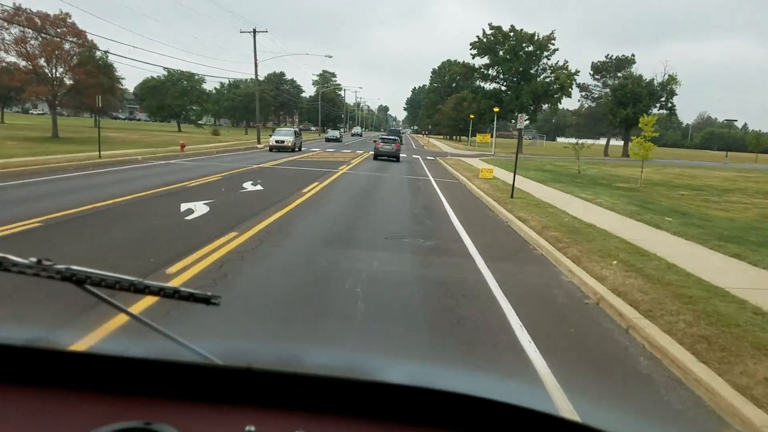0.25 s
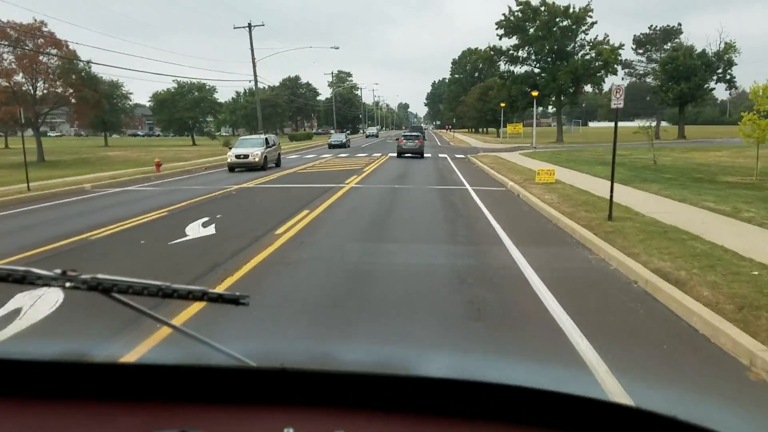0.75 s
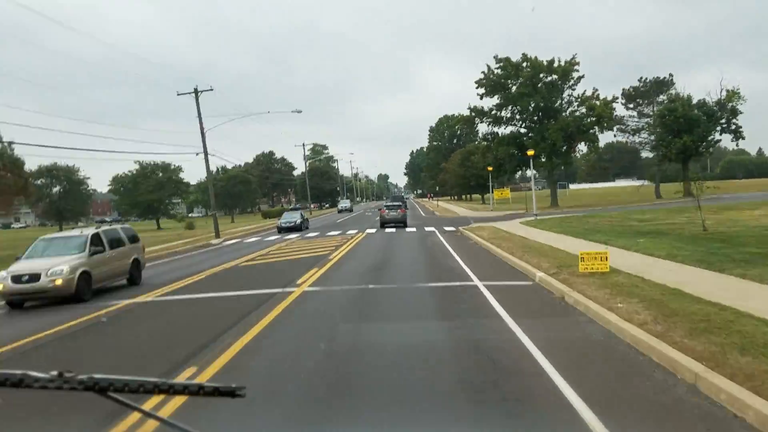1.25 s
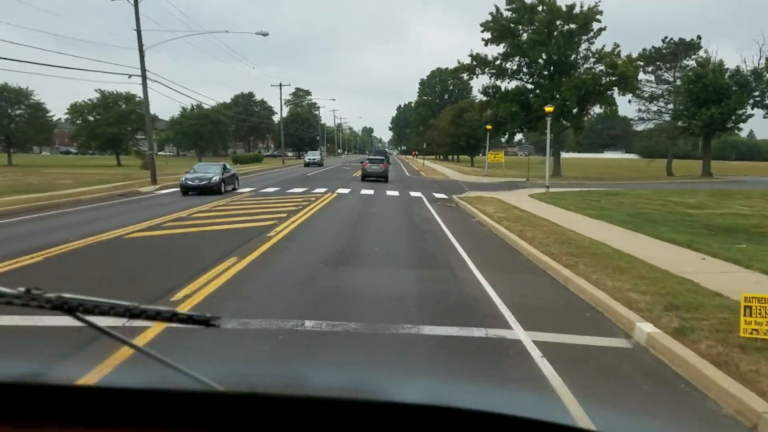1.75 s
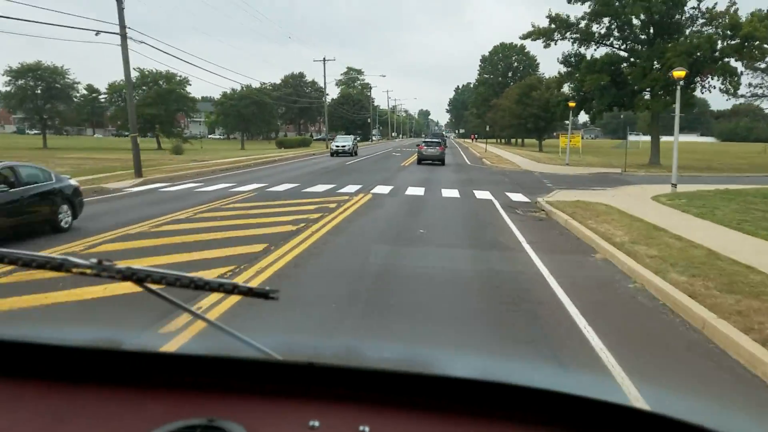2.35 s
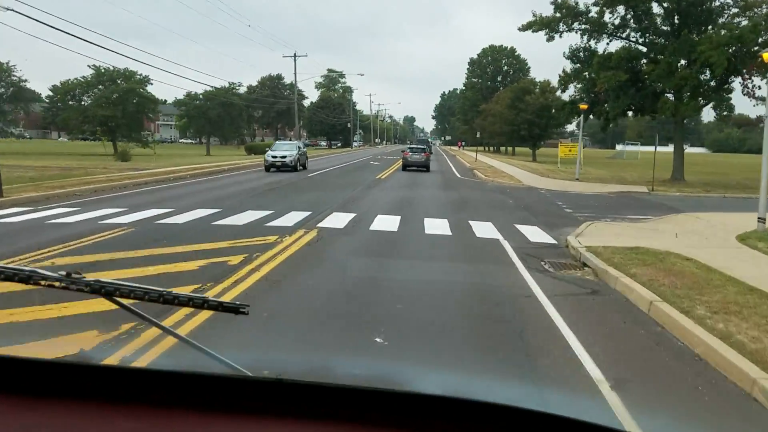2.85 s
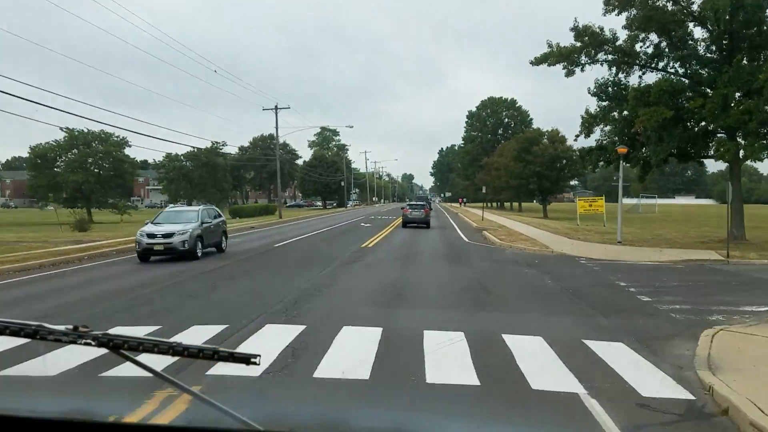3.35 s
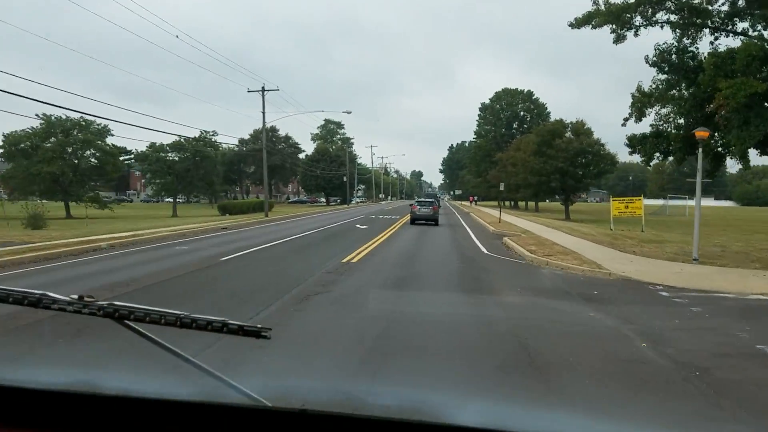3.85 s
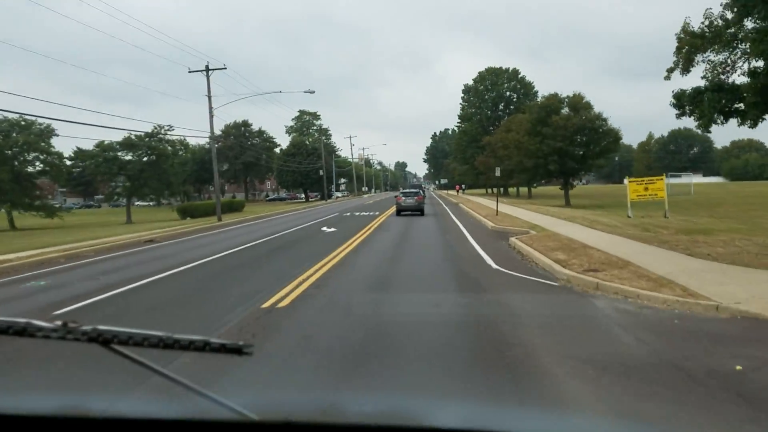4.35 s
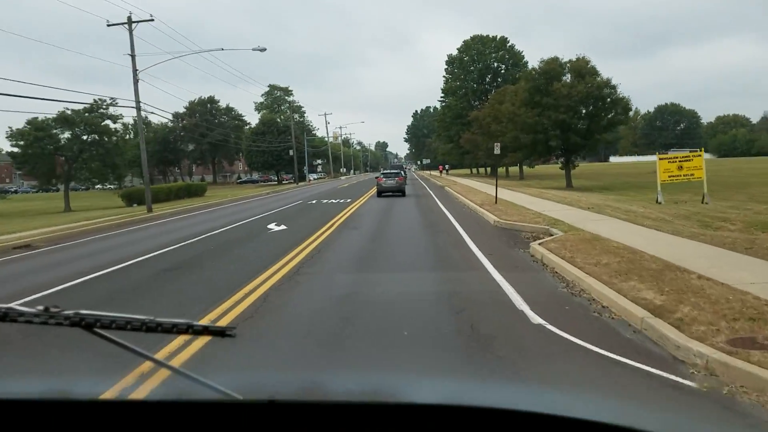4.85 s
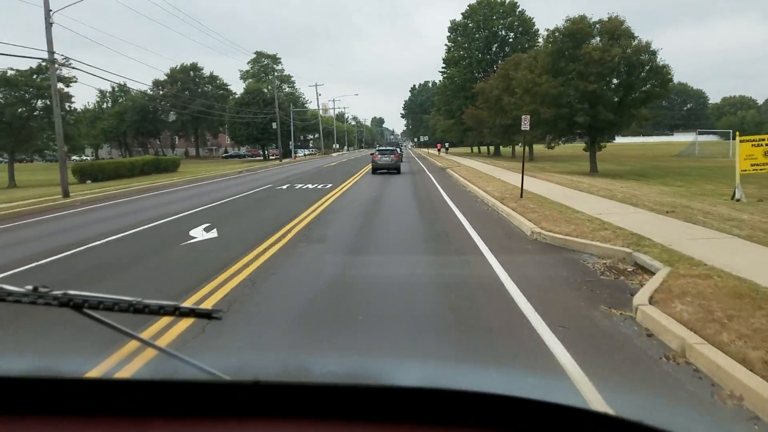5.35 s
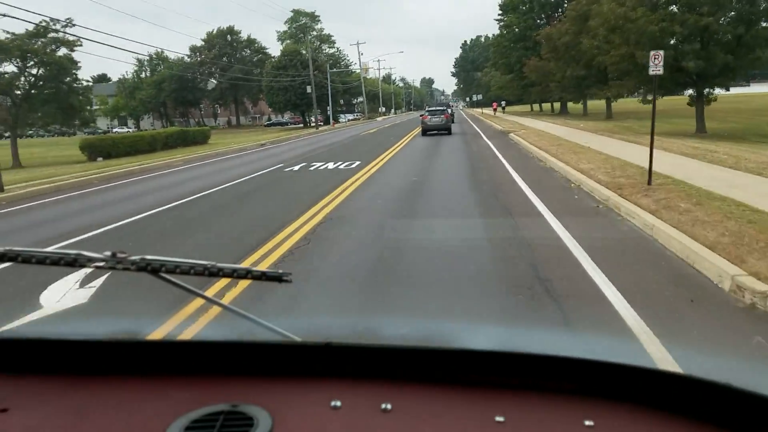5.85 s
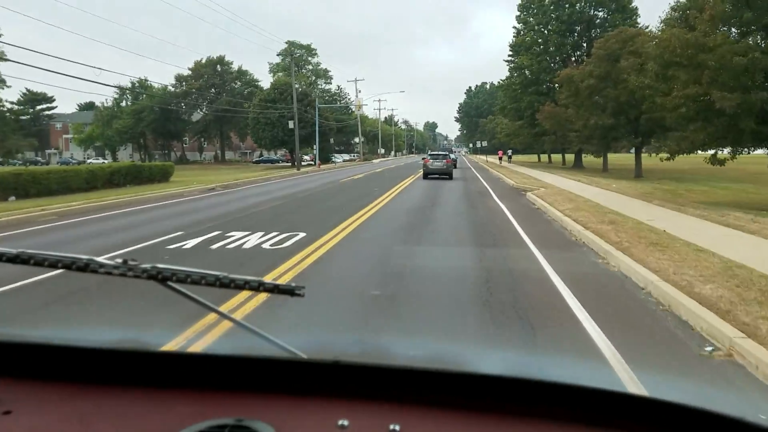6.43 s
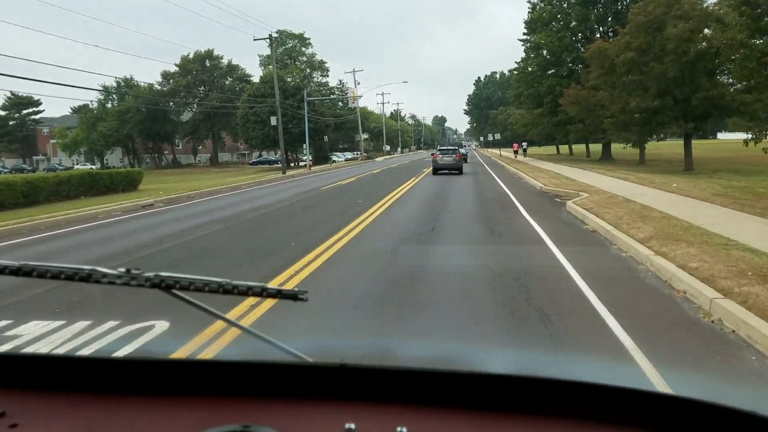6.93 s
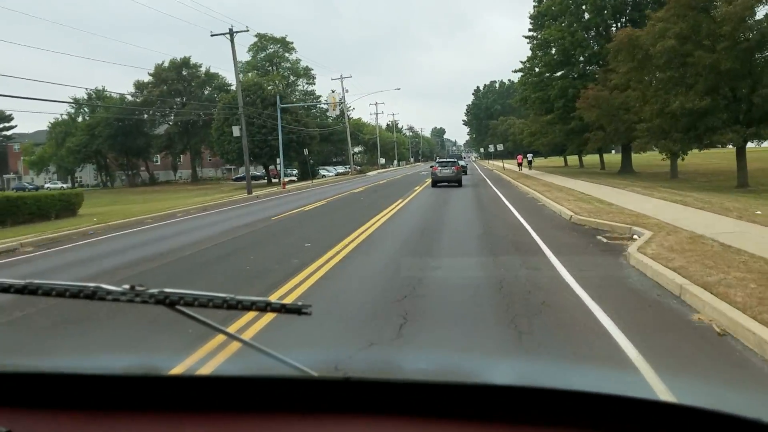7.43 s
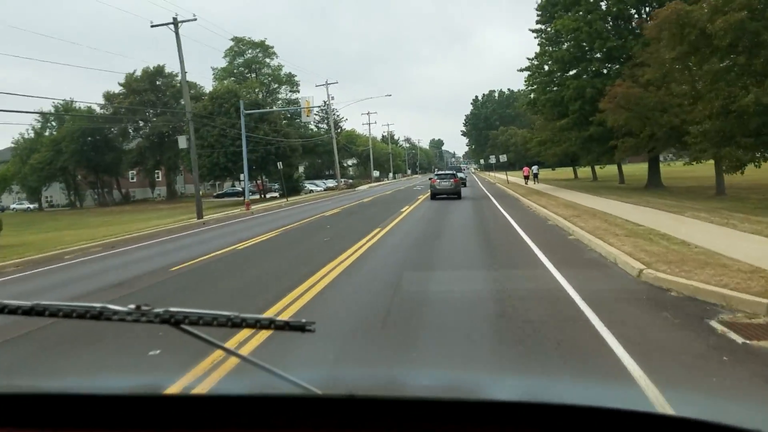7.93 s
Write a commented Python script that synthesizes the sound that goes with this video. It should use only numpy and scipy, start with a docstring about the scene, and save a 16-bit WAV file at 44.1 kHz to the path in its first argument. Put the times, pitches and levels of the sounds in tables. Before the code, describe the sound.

A large diesel truck engine drones and clatters throughout, heard from inside the hollow, booming cab with tyre rumble and a steady hiss of air. In the first second the engine runs lightly while a draught thumps on the right microphone. At about 1.3 seconds the engine takes on load and grows louder, and rough road brings heavier rumble, a flurry of rattling fittings and a few thin, high squeaks until about 2 seconds. The drone holds, with brief rattles around 3.5 to 4 seconds. From 5 to 5.7 seconds the rumble swells again with more wind buffeting, then the engine eases. It pushes again near 7 seconds, with another bump and a faint, buzzy metallic ring, also heard around 2 seconds. From 7.5 seconds it eases off and drops slightly in pitch, with more wind thumps around 8 seconds.

```python
"""A deep diesel drone fills the cab of a cruising truck, over rumbling tyres and hissing air.
Each cylinder of the two-stroke V8 fires once per crankshaft turn, so the exhaust drones, the engine
clatters and a metal part sings near 2 kHz. A draught buffets the right microphone, loose fittings
rattle, and trim squeaks on the first rough patch of road. The driver adds load and eases off again."""
import sys
import numpy as np
from scipy import signal
from scipy.fft import rfft, irfft, next_fast_len
from scipy.io import wavfile
from scipy.ndimage import map_coordinates

SR = 44100
rng = np.random.default_rng(int(sys.argv[2]) if len(sys.argv) > 2 else 0)


def unload_wav(signal):
    """Save mono or channel-first audio to the path in sys.argv[1] as 16-bit WAV at rate SR, clipped to [-1, 1]."""
    wavfile.write(
        sys.argv[1],
        SR,
        np.round(np.clip(np.atleast_2d(signal).T, -1, 1) * 32767).astype(np.int16),
    )


N = 361175

# How alike the two sides of the cab sound: pitch_hz, likeness (0 to 1)
STEREO_LIKENESS = [(30, 0.36), (110, 0.87), (200, 0.98), (380, 0.7), (700, 0.57), (1300, 0), (2400, 0),
                   (4400, 0)]
# Which side is louder: pitch_hz, left_minus_right_db
STEREO_BALANCE = [(30, -2), (100, -1.5), (500, -0.5), (1200, 2), (2500, 2.5), (4500, 0.5), (8500, 3.3),
                  (13000, 0)]
# How fast the crankshaft spins: time_s, turns_per_s
CRANK_SPEED = [(0, 25.88), (.65, 25.77), (1.05, 25.83), (1.4, 25.58), (1.65, 25.7), (1.92, 25.53),
               (2.15, 25.63), (2.5, 25.55), (3.5, 25.62), (4.8, 25.71), (6.1, 25.89), (6.6, 25.85),
               (7.1, 25.55), (7.4, 25.47), (7.7, 25.29), (8.19, 25.1)]
# The driver's pedal: time_s, effort_db, firing_note_db
PEDAL = [(0, -4.5, -24), (.6, -6, -27.5), (1.15, -5.5, -26), (1.38, 1.5, -23.5), (1.72, 2, -17),
         (1.95, 1, -18), (2.55, 2, -15), (3.05, 0, -16.5), (4.05, 0.5, -16), (5.57, -1.5, -18),
         (5.75, -3, -23.5), (6.4, -4.5, -21), (6.73, -4.5, -25), (6.98, 0.5, -19), (7.36, 1, -20),
         (7.55, -2, -28.5), (8.19, -2, -26.5)]
# The drone's notes, called orders: cycles_per_turn, relative_db, left_minus_right_db
DRONE_ORDERS = [(2, -24, -2), (3, -21, 1), (4, -1, 1), (5, -8, -2), (6, -9, 2), (7, -19, 0), (8, 0, 0),
                (9, -8, -1), (10, -23, 0), (11, -8, 5), (12, -17, -1), (13, -24, -1), (15, -19, 6),
                (16, -22, -6), (17, -19, 7), (20, -19, -3), (21, -23, -1), (22, -22, 1), (24, -21, 12),
                (28, -25, 4), (29, -20, -2), (30, -24, -1), (31, -25, 5), (33, -25, 8), (34, -25, -2),
                (35, -24, 1), (38, -23, 5), (40, -22, -2), (42, -21, 10)]
# The beat of one bank (row) of four cylinders: time_s, level_db
BANK_BEAT = [(0, -22.5), (.7, -25.5), (1.2, -20.5), (1.4, -15), (2, -17.5), (2.2, -19.5), (3.75, -18.5),
             (3.98, -13.5), (4.2, -17), (5.52, -17.5), (5.72, -20), (7.3, -22.5), (7.9, -19.5), (8.19, -22)]
# The throb of uneven cylinders: time_s, level_db
CYLINDER_THROB = [(0, -26), (1.45, -26.5), (1.65, -22), (2.2, -19.5), (3, -26), (5.1, -25), (5.9, -30.5),
                  (6.8, -27), (7.3, -20), (7.55, -26.5), (8.19, -26)]
# The whine of a timing gear: time_s, level_db
GEAR_WHINE = [(0, -38), (1, -37.5), (2, -34), (5, -35.5), (6.1, -39), (6.9, -31.5), (7.3, -42), (8.19, -40)]
# Ringing engine covers: pitch_hz, width_hz, gain_db
COVER_RINGS = [(516.6, 11.5, -2.5), (739, 13.6, 2), (828, 20, -4), (1048, 39, 1.5), (1250, 42, -16),
               (1591, 38, -7.5)]
# Spells when the metal part sings out: peak_s, level_db, half_length_s
SINGING_SPELLS = [(.96, -40.5, 0.14), (2.17, -38, 0.23), (3.442, -35, 0.034), (4.96, -42, 0.046),
                  (5.317, -36.5, 0.062), (6.3, -42, 0.34), (7.354, -36.5, 0.49)]
# Rough patches of road: start_s, extra_rumble_db, length_s
ROUGH_PATCHES = [(1.25, 12.5, 0.38), (2.7, 0, .12), (5.078, 6.5, 0.69), (7.127, 9, 0.3), (7.95, 2.5, 0.18)]
# The strongest eddies (swirls of air): peak_s, thud_db, rasp_db, half_length_s
STRONG_EDDIES = [(0.137, -10, -21, 0.026), (0.227, -9, -15, 0.024), (0.331, -4, -11, 0.0087),
                 (0.407, -8, -27, 0.018), (0.584, -1.5, -9, 0.0057), (0.656, -14, -20, 0.017),
                 (1.245, -11, -25, 0.015), (2.342, -7, -21, 0.019), (2.781, -9, -25, 0.022),
                 (3.354, -8, -32, 0.011), (4.539, -8, -22, 0.013), (4.889, -5.5, -17, 0.039),
                 (5.358, -8, -32, 0.012), (5.506, -7.5, -11.5, 0.017), (5.562, -8, -14, 0.01),
                 (6.149, -8, -16, 0.016), (7.233, -10, -14.5, 0.015), (7.387, -9, -26, 0.025),
                 (8.055, -7.5, -20, 0.037), (8.147, -7.5, -11.5, 0.028)]
# Gusts full of weaker eddies: start_s, end_s
GUST_TIMES = [(.08, .22), (1.27, 1.7), (5.08, 5.75), (7.05, 8.7)]
# Loose fittings rattling: start_s, jingle_db, clack_db
RATTLE_HITS = [(0.3294, -48, -39), (0.6913, -40, -43), (1.3424, -21.5, -34), (1.3644, -36, -24.5),
               (1.4094, -34, -35), (1.5354, -35, -28.5), (1.6394, -43, -29), (1.6821, -38, -30),
               (1.8557, -28, -32), (2.1355, -38, -35), (3.5753, -27, -40), (3.7479, -26, -34),
               (3.9973, -35, -38), (4.2228, -36, -45), (6.0921, -34, -41), (7.8785, -33, -39)]
# Squeaking trim: peak_s, pitch_hz, level_db, half_length_s
TRIM_SQUEAKS = [(1.402, 8900, -36, .03), (1.477, 8970, -27, 0.0096), (1.495, 8800, -40, .03),
                (1.574, 8380, -35, .02)]

# The tone colour of each noisy sound: pitch_hz, gain_db
BLOCK_SPECTRUM = [(250, -18), (600, -2), (1050, 1), (1400, -5), (1650, -4), (1900, -7), (2150, -9),
                  (2450, -13.5), (2900, -23), (4500, -35), (9000, -60)]  # clattering engine block
TYRE_SPECTRUM = [(15, -24), (30, 0), (50, 3), (80, 7.5), (115, 1.5), (160, 5.5), (250, 6.5), (400, -35),
                 (800, -74)]  # rumbling tyres and chassis
CAB_SPECTRUM = [(50, -20), (90, 10), (135, 6.5), (180, 0.5), (280, 6.5), (350, 0.5), (520, -2.5), (750, -2),
                (950, -34), (1600, -16), (4000, -74)]  # booming hollow cab
AIR_SPECTRUM = [(1200, -33), (2600, 0), (3800, 0.5), (4700, -2), (5700, -7), (7400, -10.5), (8700, -7),
                (10000, -13), (12000, -11.5), (15800, -13)]  # hissing air
RASP_SPECTRUM = [(150, -14), (350, 5.5), (550, -4), (900, -15), (1600, -38), (3500, -43), (7000, -72)]  # fine turbulence in an eddy
JINGLE_SPECTRUM = [(3000, -25), (7000, -10), (11000, 0.5), (15000, 1)]  # bright part of a rattle
CLACK_SPECTRUM = [(500, -17), (1300, 2), (2300, 3.5), (3000, -11.5), (4800, -10.5), (8000, -21.5)]  # lower part of a rattle

TOP_HZ = 15850


def amp(db):
    """Turn decibels into a number to multiply by."""
    return 10 ** (np.asarray(db) / 20)


def unit(x):
    """Scale a signal to an average (rms) level of 1."""
    return x / np.sqrt(np.mean(x ** 2) + 1e-20)


def along(points, hz):
    """Read between (pitch_hz, value) points on a logarithmic pitch scale."""
    pitches, values = np.transpose(points)
    return np.interp(np.log(hz + 1), np.log(pitches + 1), values)


def curves(rows):
    """Give each column after the time one value per sample."""
    times, *columns = np.transpose(rows)
    return [np.interp(np.arange(N) / SR, times, column) for column in columns]


def wobble(rate):
    """A smooth curve through `rate` random values a second."""
    knots = rng.standard_normal(int(N * rate / SR) + 4)
    coarse = np.arange(0, N, 32)
    return np.interp(np.arange(N), coarse, map_coordinates(knots, [coarse * rate / SR]))


def filtered(x, response):
    """Multiply each frequency in x by response(hz)."""
    size = next_fast_len(N + SR // 2)
    return irfft(rfft(x, size) * response(np.fft.rfftfreq(size, 1 / SR)), size)[..., :N]


def resonate(x, rings):
    """Let x ring a part whose notes are (pitch_hz, width_hz, gain_db) rows."""
    def response(hz):
        return sum((-1) ** k * amp(db) * 1j * hz * width / (pitch ** 2 - hz ** 2 + 1j * hz * width)
                   for k, (pitch, width, db) in enumerate(rings))
    return filtered(x, response)


def colour(x, spectrum):
    """Shape the tone of x with (pitch_hz, gain_db) points."""
    return filtered(x, lambda hz: amp(along(spectrum, hz)))


def pan(db):
    """Left and right gains that make the left louder by db."""
    return amp(np.vstack([db, -db]) / 2)


def noise():
    """Two unrelated white noises."""
    return rng.standard_normal((2, N))


def in_cab(pair):
    """Blend two unrelated signals into stereo at level 1: alike in the bass, unlike in the treble."""
    def blend(hz):
        angle = np.arccos(np.clip(along(STEREO_LIKENESS, hz), 0, 1)) / 2
        return np.array([np.cos(angle), np.sin(angle)])
    mid, side = filtered(pair, blend)
    stereo = np.array([mid + side, mid - side])
    return unit(filtered(stereo, lambda hz: pan(along(STEREO_BALANCE, hz))))


def crank():
    """Count the crankshaft's slightly unsteady turns since the start."""
    speed, = curves(CRANK_SPEED)
    return np.cumsum(speed) / SR + .002 * wobble(12)


def effort():
    """How hard the engine works, in dB over steady cruising."""
    return curves(PEDAL)[0]


def shaking(rise_s=0.06, settle_s=0.35):
    """Rough road shakes the chassis at once and it settles slowly; in dB over smooth asphalt."""
    t = np.arange(N) / SR
    shake_db = np.zeros(N)
    for start_s, db, length_s in ROUGH_PATCHES:
        rise = np.clip(1 + (t - start_s) / rise_s, 0, 1)
        settle = np.exp(-np.maximum(t - start_s - length_s, 0) / settle_s)
        shake_db += db * rise * settle
    return shake_db


def drone(turns, overtone_db, bright_db, flutter_db, waver_db, load_share, chug, spread):
    """Each bank fires 4 times a turn, both together 8 times; uneven cylinders add the other orders."""
    firing_db = curves(PEDAL)[1]
    load_db = firing_db - np.percentile(firing_db, 75)
    # these four orders follow their own curves instead of the level in DRONE_ORDERS
    own_db = {4: curves(BANK_BEAT)[0] + waver_db * wobble(7),
              5: curves(CYLINDER_THROB)[0] + 2 * waver_db * wobble(6),
              8: firing_db + 0.5 + .5 * waver_db * wobble(7),
              29: curves(GEAR_WHINE)[0]}  # the gear whines whatever the load
    out = np.zeros((2, N))
    for order, db, lean_db in DRONE_ORDERS:
        level_db = db + overtone_db + bright_db * (order / 40) ** 4 + load_share * load_db
        level_db += flutter_db * (order / 20) ** .5 * wobble(6)
        # low notes linger longer in pipe and cab, so every turn sweeps downwards: the diesel's chug
        phase = np.pi * chug * order ** 2 + rng.normal(0, (order / 20) ** 2)
        # short waves reach the two microphones out of step
        phase = phase + (-1) ** order * order * spread * np.array([[1], [-1]])
        tone = np.sqrt(2) * np.sin(2 * np.pi * order * turns + phase)
        out += amp(own_db.get(order, level_db)) * unit(pan(lean_db)) * tone
    return out


def knocks(turns, jitter_s, scatter_db, ring_s, cylinders=8):
    """Every cylinder knocks once a turn and reaches the cab with its own short, dense ring."""
    t = np.arange(SR // 20) / SR
    out = np.zeros((2, N))
    for cylinder in range(cylinders):
        ring = rng.standard_normal((2, len(t))) * amp(-60 * t / ring_s)
        firing_turns = np.arange(np.floor(turns[-1])) + cylinder / cylinders
        due = np.interp(firing_turns, turns, np.arange(N))
        lateness, strength = rng.standard_normal((SR // 100, 2))[:len(due)].T
        samples = np.clip(due + jitter_s * SR * lateness, 0, N - 1).astype(int)
        kicks = np.bincount(samples, amp(scatter_db * strength), N)
        out += signal.oaconvolve(kicks[None], ring, axes=1)[:, :N]
    return unit(out)


def clatter(turns, pulse_db, rush_db, block_db, cover_db):
    """Knocks and rushing gas, swelling a little once a turn, ring the engine block and its covers."""
    knock = knocks(turns, jitter_s=.00012, scatter_db=2.5, ring_s=0.051)
    knock = colour(knock, [(600, -13.5), (1050, -6.5), (1300, -2)])  # combustion sounds hard and bright
    drive = (knock + amp(rush_db) * noise()) * amp(pulse_db * np.cos(2 * np.pi * turns))
    block = amp(block_db) * in_cab(colour(drive, BLOCK_SPECTRUM))
    covers = amp(cover_db) * in_cab(resonate(drive + noise(), COVER_RINGS))
    return amp(effort()) * (block + covers)


def singing_metal(turns, pitch_hz, hum_db, effort_share, pulse_db, buzz_db, flutter_db):
    """A freely ringing metal part, shaken once a turn, hums with the engine and sings in buzzy spells."""
    t = np.arange(N) / SR
    hum = amp(hum_db + effort_share * effort())
    spells = sum(amp(db) * np.exp(-((t - peak_s) / half_s) ** 2) for peak_s, db, half_s in SINGING_SPELLS)
    wavering_hz = pitch_hz + 11 * wobble(70) + 6 * wobble(5)
    sway = 0.64 * np.array([wobble(8), wobble(8)])  # radians: left and right stay nearly in step
    tone = unit(np.sin(2 * np.pi * np.cumsum(wavering_hz) / SR + sway))
    narrow_noise = resonate(noise(), [(pitch_hz, 70, 0)])
    buzz = in_cab(resonate(narrow_noise, [(pitch_hz, 180, 0)]))
    flutter = amp(flutter_db * wobble(18) + pulse_db * np.cos(2 * np.pi * turns))
    return (hum + spells) * flutter * (tone + amp(buzz_db) * buzz)


def tyre_rumble(level_db, uneven_db):
    """Tyres and chassis rumble, louder where the road is rough."""
    rumble_db = level_db + shaking() + uneven_db * wobble(8)
    return amp(rumble_db) * in_cab(colour(noise(), TYRE_SPECTRUM))


def cab_boom(level_db, shake_share, effort_share):
    """The hollow cab booms along with the road and the engine."""
    boom_db = level_db + shake_share * shaking() + effort_share * effort() + 1.14 * wobble(20)
    return amp(boom_db) * in_cab(colour(noise(), CAB_SPECTRUM))


def hiss(turns, level_db, pulse_db, effort_share, shake_share):
    """Air hisses through the cab, louder with effort and rough road, pulsing a little with the engine."""
    hiss_db = level_db + effort_share * effort() + shake_share * shaking()
    flicker_db = pulse_db * np.cos(2 * np.pi * turns) + 0.98 * wobble(150)
    return amp(hiss_db + flicker_db) * in_cab(colour(noise(), AIR_SPECTRUM))


def weak_eddies(per_s=6, thud_db=-12.5, rasp_db=-24, scatter_db=2, half_s=0.018):
    """Gusts shed small eddies at uneven intervals; gives rows like STRONG_EDDIES."""
    count = int(N / SR * per_s)
    times = (np.arange(count) + rng.random(count)) / per_s
    sizes_db = scatter_db * rng.standard_normal(count)
    return [(peak_s, thud_db + db, rasp_db + db, half_s) for peak_s, db in zip(times, sizes_db)
            if any(start_s < peak_s < end_s for start_s, end_s in GUST_TIMES)]


def draught(eddy_hz, scatter, thud_gain_db, rasp_gain_db, left_leak_db):
    """Eddies slap the right microphone: a few uneven swings of pressure and a rasp of fine turbulence."""
    t = np.arange(N) / SR
    thud, rasp = np.zeros((2, N))
    for peak_s, thud_db, rasp_db, half_s in STRONG_EDDIES + weak_eddies():
        near = abs(t - peak_s) < .1
        swell = np.exp(-np.pi / 2 * ((t[near] - peak_s) / half_s) ** 2)
        thud[near] += amp(thud_db + thud_gain_db) * swell
        rasp[near] += amp(rasp_db + rasp_gain_db) * swell
    swing_hz = eddy_hz * np.exp(scatter * wobble(350))
    swings = np.sin(2 * np.pi * np.cumsum(swing_hz) / SR)
    swings = unit(colour(swings, [(20, -32), (60, 1.5), (110, -1)]))
    turbulence = unit(colour(noise()[0], RASP_SPECTRUM))
    return (thud * swings + rasp * turbulence) * np.array([[amp(left_leak_db)], [1]])


def rattles(clack_gain_db, rise_s, decay_s):
    """Loose fittings chatter in brief flurries of tiny contacts."""
    t = np.arange(SR // 4) / SR
    flurry = (1 - np.exp(-t / rise_s)) * amp(-60 * t / decay_s)
    bright, low = np.zeros((2, N + SR))
    for start_s, jingle_db, clack_db in RATTLE_HITS:
        start = round(start_s * SR)
        bright[start:start + len(t)] += amp(jingle_db) * flurry
        low[start:start + len(t)] += amp(clack_db + clack_gain_db) * flurry
    contacts = unit(amp(2.0 * wobble(500)))
    jingle = bright[:N] * in_cab(colour(noise(), JINGLE_SPECTRUM))
    clack = low[:N] * in_cab(colour(noise(), CLACK_SPECTRUM))
    return contacts * (jingle + clack)


def squeaks(waver_hz):
    """Trim rubs in short, thin chirps as the cab twists."""
    t = np.arange(N) / SR
    waver = waver_hz * np.cumsum([wobble(600), wobble(600)], axis=1) / SR
    out = np.zeros((2, N))
    for peak_s, pitch_hz, db, half_s in TRIM_SQUEAKS:
        swell = amp(db) * np.exp(-((t - peak_s) / half_s) ** 2)
        out += swell * np.sin(2 * np.pi * (pitch_hz * t + waver))
    return out


def scene():
    """Engine, fittings, air and road as heard behind the windscreen."""
    turns = crank()
    engine = drone(turns, overtone_db=-16.5, bright_db=1.5, flutter_db=2.0, waver_db=0.84,
                   load_share=0.79, chug=.065, spread=0.016)
    engine += clatter(turns, pulse_db=0.1, rush_db=-7, block_db=-25.0, cover_db=-30.5)
    engine += singing_metal(turns, pitch_hz=2020, hum_db=-45, effort_share=0.71,
                            pulse_db=0.3, buzz_db=-2.5, flutter_db=0.9)
    fittings = rattles(clack_gain_db=12, rise_s=0.0054, decay_s=0.12) + squeaks(waver_hz=222)
    air = hiss(turns, level_db=-38.5, pulse_db=0.35, effort_share=0.94, shake_share=0.17)
    air += draught(eddy_hz=148.9, scatter=.5, thud_gain_db=-2.5, rasp_gain_db=-0.5, left_leak_db=-50)
    road = tyre_rumble(level_db=-32.0, uneven_db=0.5)
    road += cab_boom(level_db=-23.0, shake_share=0.18, effort_share=0.51)
    return engine + fittings + air + road


def record(dry):
    """Round off the highest peaks and cut all the treble above TOP_HZ."""
    rounded = dry / (1 + np.abs(dry) ** 8) ** (1 / 8)
    return filtered(rounded, lambda hz: hz < TOP_HZ)


dry = scene()
out = record(dry)
unload_wav(out)
```